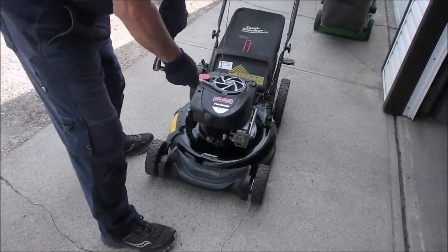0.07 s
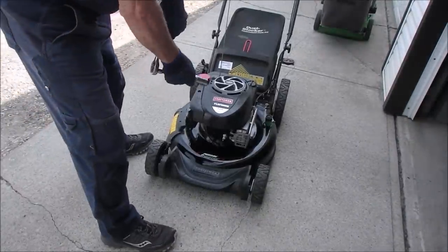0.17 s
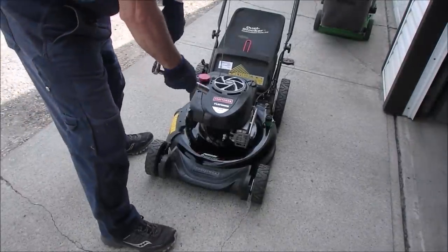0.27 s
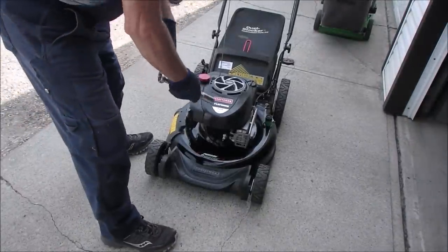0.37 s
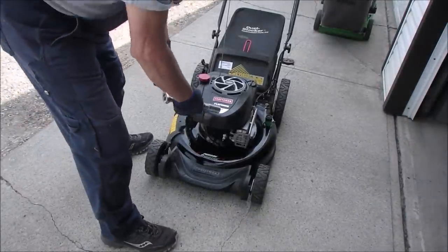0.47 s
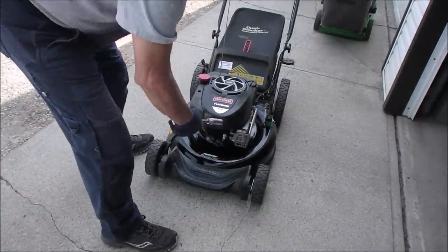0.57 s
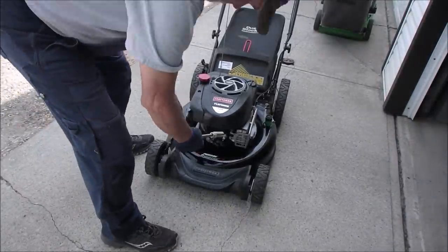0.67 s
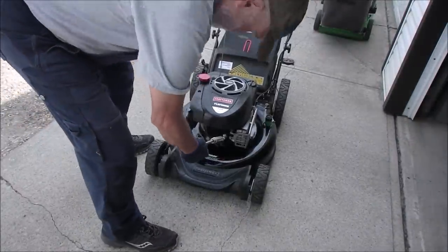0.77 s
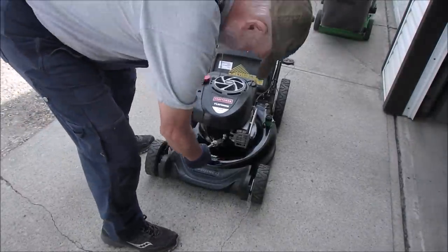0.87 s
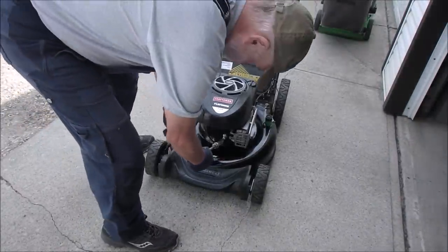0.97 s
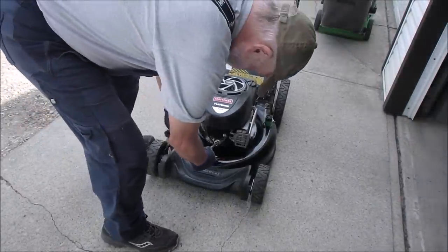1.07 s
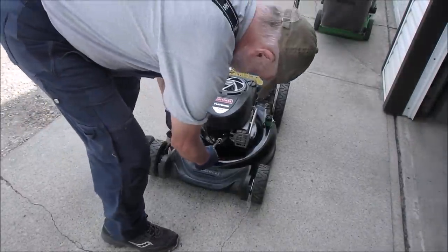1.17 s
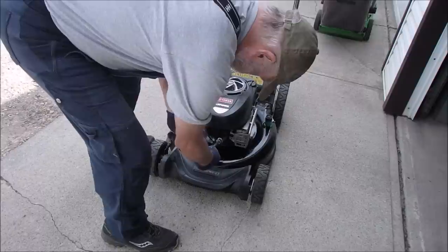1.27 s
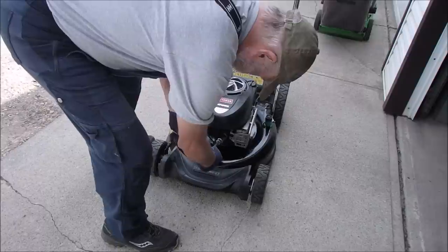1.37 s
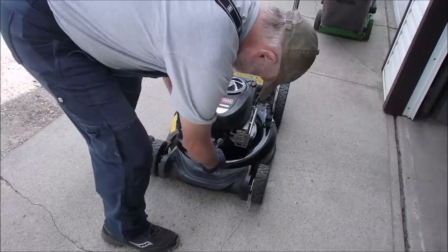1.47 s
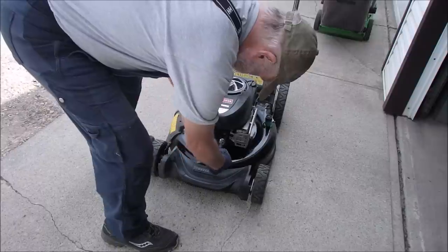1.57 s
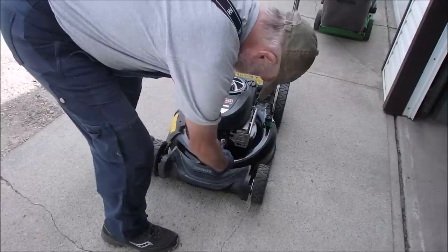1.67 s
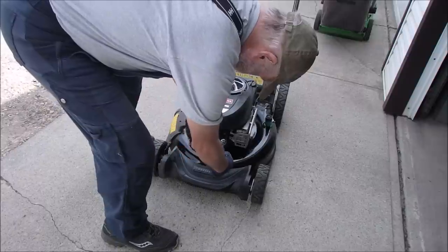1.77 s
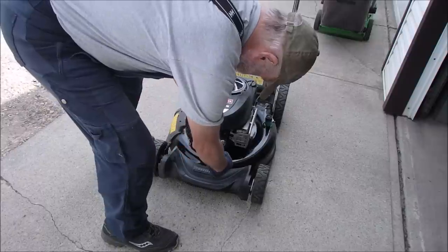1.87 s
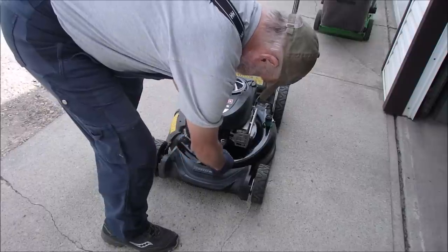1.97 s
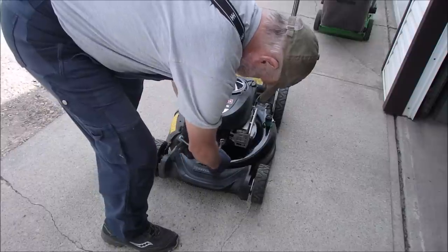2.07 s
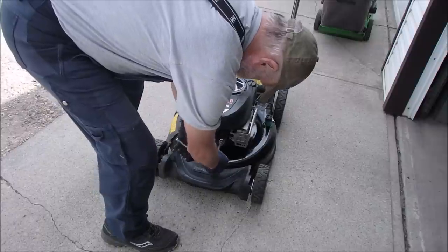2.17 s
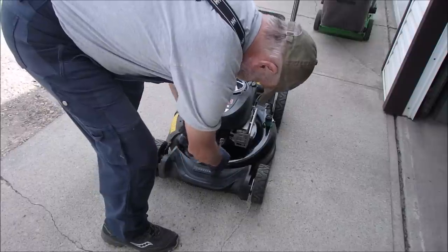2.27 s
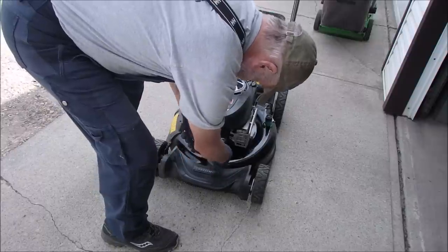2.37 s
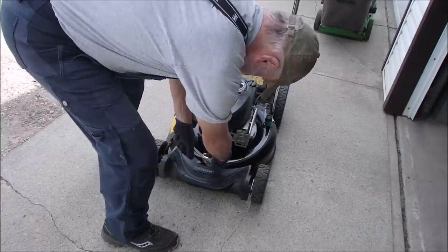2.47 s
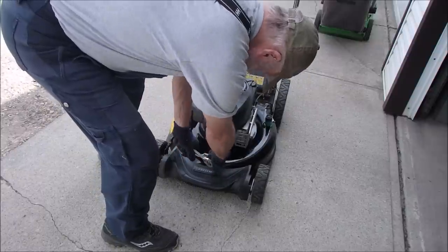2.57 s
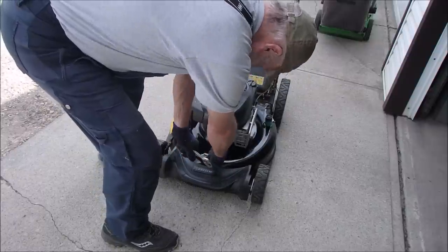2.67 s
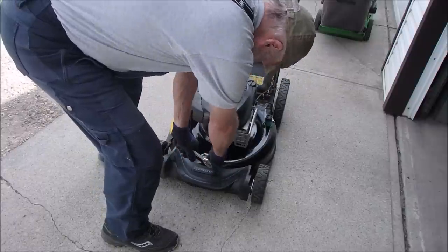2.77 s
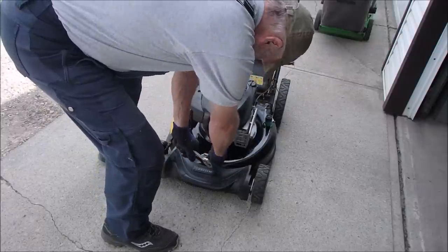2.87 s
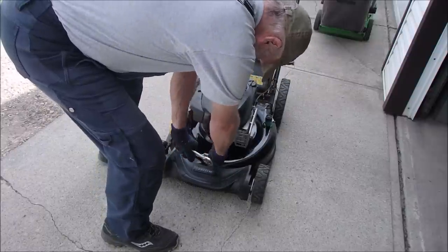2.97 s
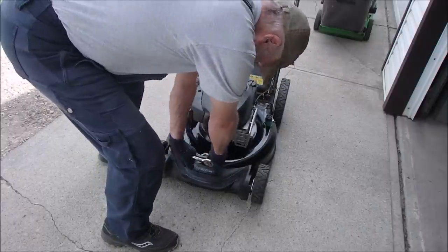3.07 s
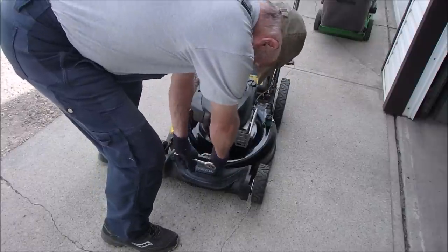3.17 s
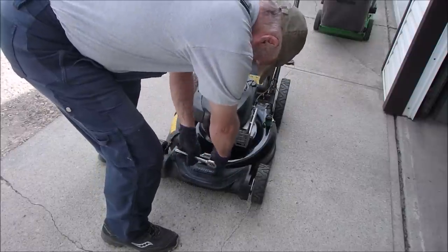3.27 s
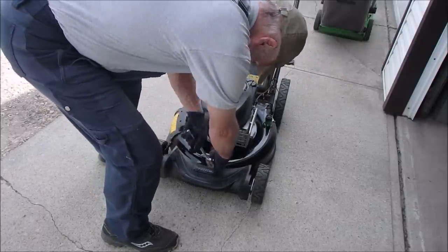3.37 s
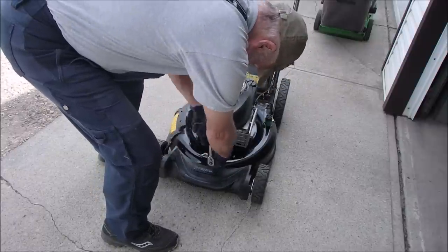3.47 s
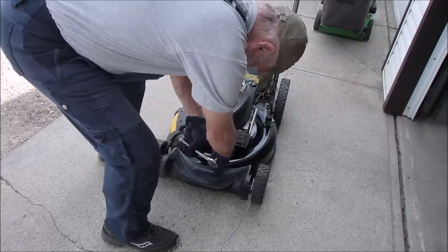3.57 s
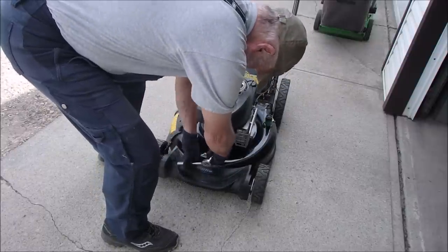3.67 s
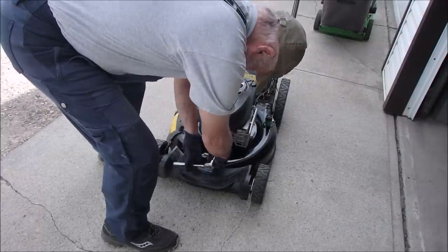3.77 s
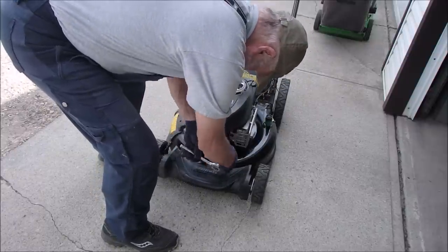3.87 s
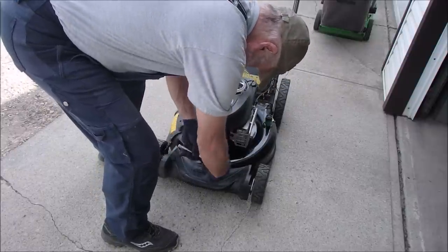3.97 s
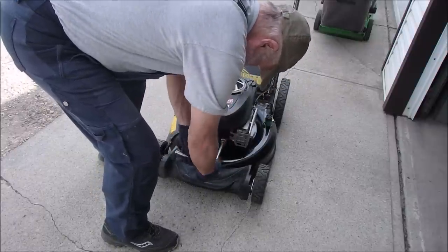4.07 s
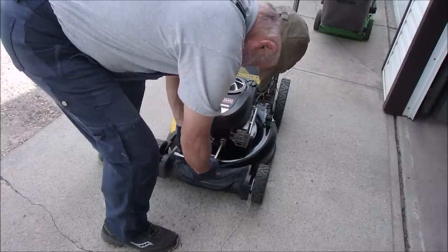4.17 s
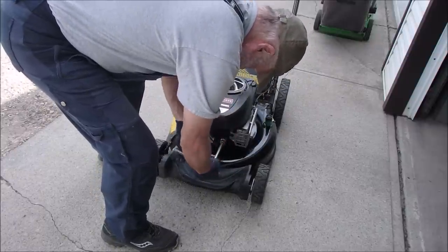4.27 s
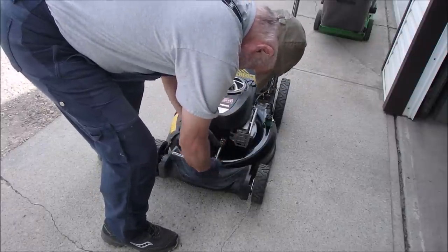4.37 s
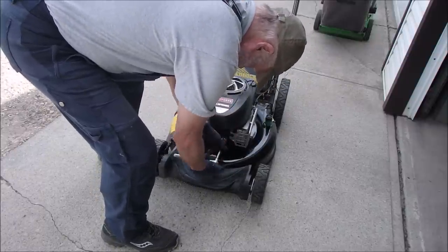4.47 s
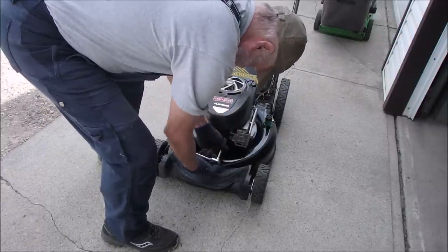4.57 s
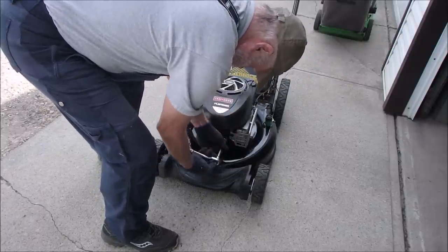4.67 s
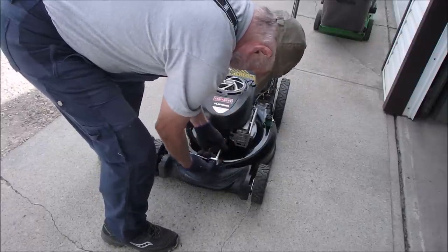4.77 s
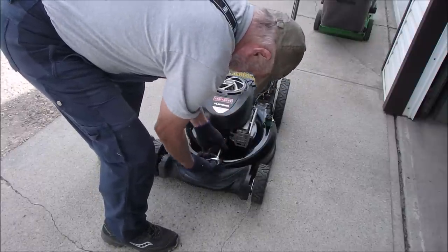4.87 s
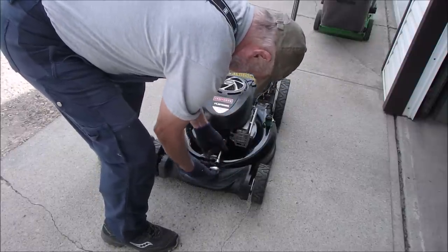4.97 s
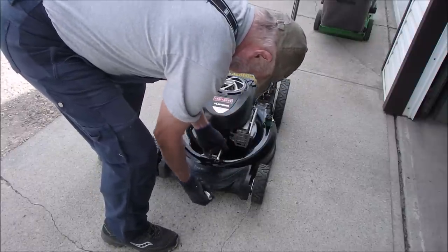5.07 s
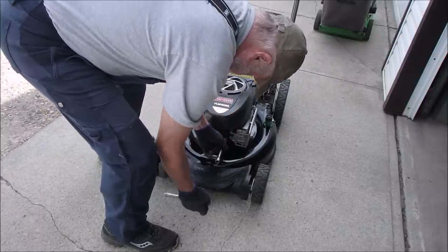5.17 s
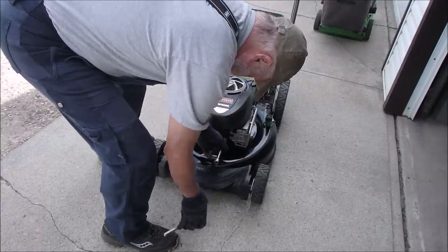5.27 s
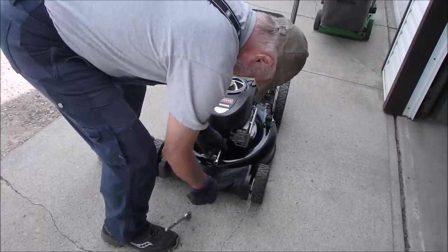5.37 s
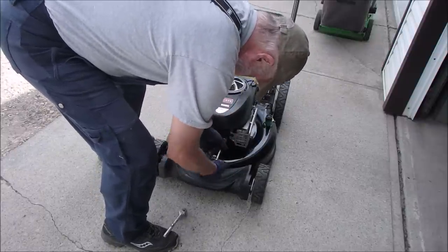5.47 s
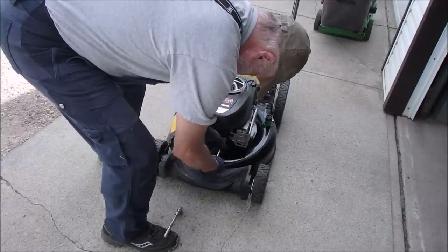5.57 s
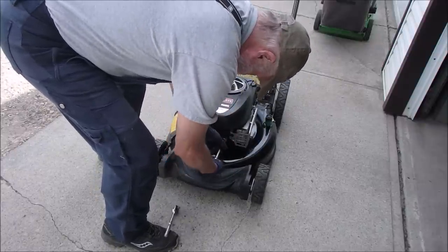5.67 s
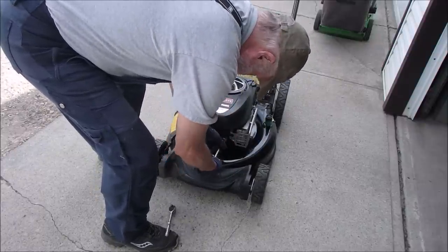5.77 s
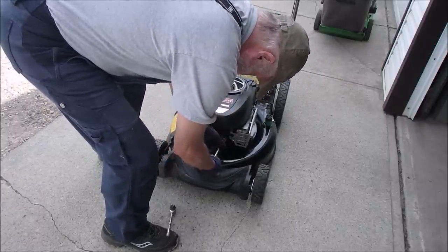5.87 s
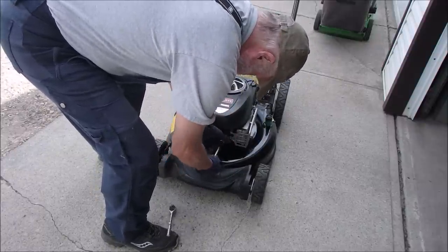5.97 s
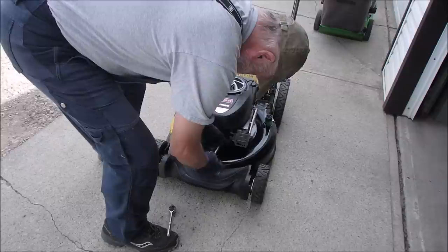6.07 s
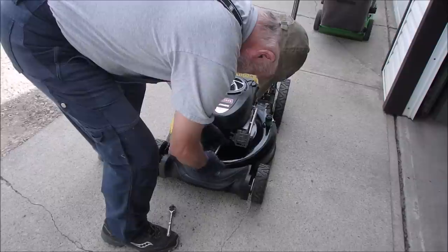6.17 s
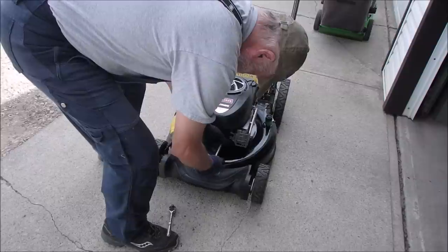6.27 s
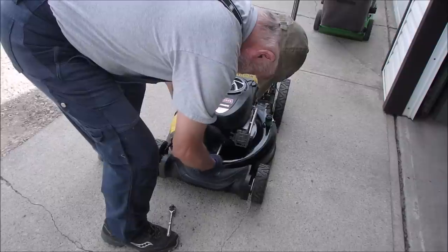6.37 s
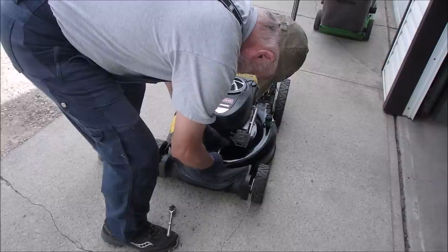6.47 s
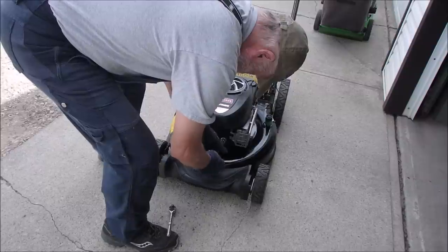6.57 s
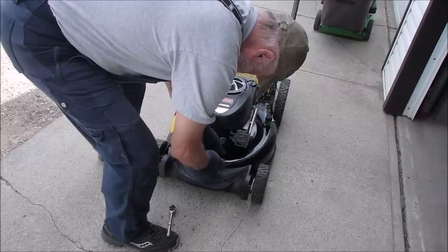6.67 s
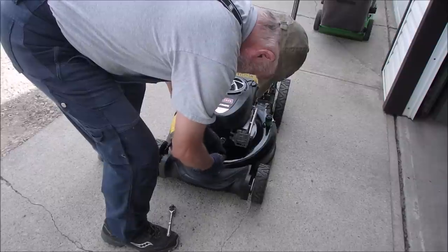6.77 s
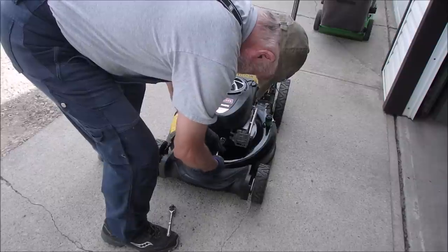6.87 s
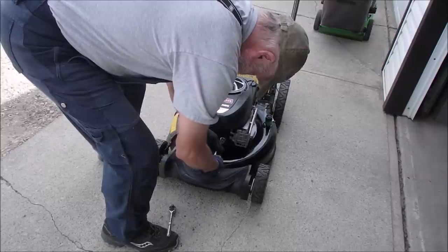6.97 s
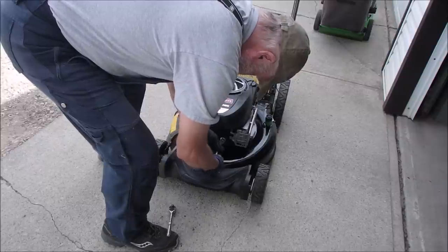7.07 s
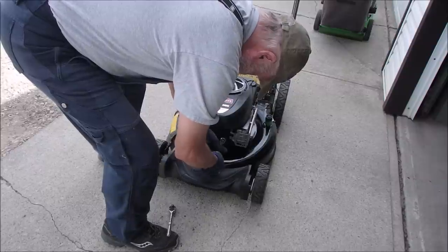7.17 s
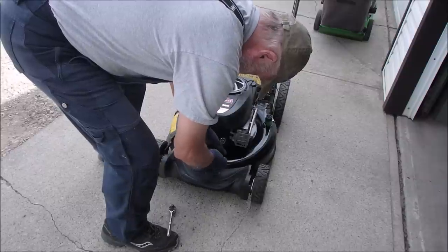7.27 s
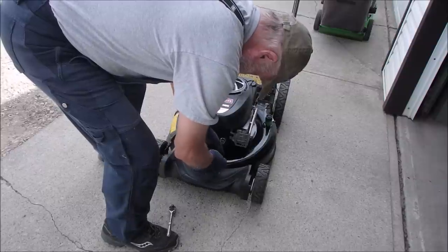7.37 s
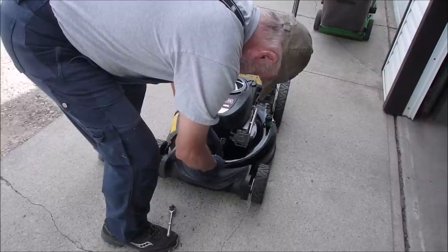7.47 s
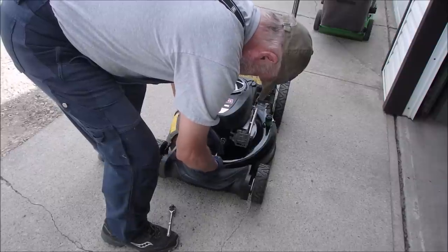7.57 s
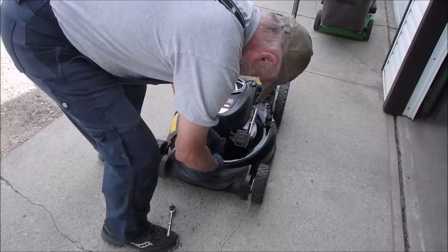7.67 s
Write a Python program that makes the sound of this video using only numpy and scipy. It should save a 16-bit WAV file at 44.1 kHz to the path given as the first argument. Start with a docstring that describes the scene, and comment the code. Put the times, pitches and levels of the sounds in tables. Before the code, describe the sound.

Close to a stereo microphone outside a garage, a ratchet ticks briefly, then steel knocks irregularly on a mower engine with a thin ringing socket. More clanks and a second ratchet burst follow. A wrench drops on concrete with a sharp ringing crack and small bounces, leaving sparse, softer knocks. A distant bird chirps hoarsely; light wind bumps mostly on the left.

```python
"""Spark plug and socket ratchet on a driveway

Close to the microphone, a spark plug is worked out of a lawn mower: steel blows are noise bursts plus engine modes.
The ratchet pawl ticks and scrapes, the wrench cracks and rings on the concrete, and gloves brush in noise swells.
Farther off a bird chirps in falling, raspy slurs; the garage front echoes and distant hum and hiss lie beneath.
Gusts bump mainly the left microphone port, and loud treble such as the drop makes the gain control duck.
"""
import sys
import numpy as np
from scipy import signal
from scipy.fft import rfft, irfft, next_fast_len
from scipy.io import wavfile
from scipy.ndimage import uniform_filter1d, minimum_filter1d, map_coordinates

SR = 44100
rng = np.random.default_rng(int(sys.argv[2]) if len(sys.argv) > 2 else 0)


def wrap_up_sound(samples):
    """Save the sound to the file named by the first command line argument, as 16-bit audio."""
    columns = np.atleast_2d(samples).T
    # keep every value between -1 and 1, then stretch to whole-number steps
    tamed = np.clip(columns, -1, 1)
    steps = np.round(tamed * 32767).astype(np.int16)
    wavfile.write(sys.argv[1], SR, steps)


N = 340879
RING = np.arange(int(.6 * SR)) / SR  # time axis of one ringing sound, s


def amp(db):
    """Decibels to gain."""
    return 10 ** (np.asarray(db) / 20)


def unit(x):
    """x at rms 1."""
    return x / np.sqrt(np.mean(x ** 2) + 1e-20)


def along(points, hz):
    """(Hz, value) points read on a log frequency axis."""
    point_hz, value = np.transpose(points)
    return np.interp(np.log(hz + 1), np.log(point_hz), value)


def tilted(spectrum, tilt):
    """A spectrum with the (Hz, dB) points of a tilt added."""
    hz, db = np.transpose(spectrum)
    return np.c_[hz, db + along(tilt, hz)]


def filtered(x, response):
    """x times a complex response of frequency."""
    n = x.shape[-1]
    padded = next_fast_len(n + 4096)
    hz = np.fft.rfftfreq(padded, 1 / SR)
    return irfft(rfft(x, padded) * response(hz), padded)[..., :n]


def wobble(rate):
    """A smooth random curve, rate knots a second."""
    knots = rng.standard_normal(int(N * rate / SR) + 4)
    return map_coordinates(knots, [np.arange(N) * rate / SR])


def swells(rows):
    """A gain curve of smooth humps from (middle s, length s, dB) rows."""
    t = np.arange(N) / SR
    return sum(amp(db) * np.exp(-2 * ((t - s) / length) ** 2) for s, length, db in rows)


def add(track, s, sound):
    """Mix a sound into the track at time s."""
    start = max(round(s * SR), 0)
    part = sound[..., :N - start]
    track[:, start:start + part.shape[-1]] += part


def noise(size, spectrum, alike, lo_hz=0, hi_hz=SR):
    """Coloured stereo noise of rms 1 between two edges; alike sets how far left and right agree."""
    hz = np.fft.rfftfreq(size, 1 / SR)
    turn = np.arccos(np.clip(along(alike, hz), -1, 1)) / 2
    gain = amp(along(spectrum, hz)) * (hz >= lo_hz) * (hz < hi_hz)
    white = rfft(rng.standard_normal((2, size)))
    mid, side = irfft(white * gain * [np.cos(turn), np.sin(turn)], size)
    return unit(np.array([mid + side, mid - side]))


# Left-right likeness of sounds close to the microphone: pitch_hz, likeness (1 = the same)
NEAR_ALIKE = [(300, 0.85), (2500, 1), (5500, 0.22), (9000, 0.64)]


def burst(spectrum, t60, lo_hz=0, hi_hz=SR, size=8192):
    """Crowded, quickly dying modes set off by one contact."""
    t = RING[:size]
    attack = 1 - np.exp(-t / .0003)
    fade = 1000 ** (-t / t60) * attack
    sound = noise(size, spectrum, NEAR_ALIKE, lo_hz, hi_hz) * fade
    return unit(sound) * np.sqrt(np.mean(fade ** 2))


def ring(modes, scatter_db, detune, tilt=((1000, 0), (2000, 0))):
    """Single modes, struck at new strengths and tilted by (Hz, dB) points; the grip detunes them a little."""
    hz, db, t60 = np.transpose(modes)[:, :, None]
    level, shift, phase = rng.standard_normal((3, len(modes), 1))
    swing = np.sin(2 * np.pi * (hz * (1 + detune * shift) * RING + phase))
    strength = amp(db + scatter_db * level + along(tilt, hz))
    sound = np.sum(strength * np.exp(-np.log(1000) * RING / t60) * swing, axis=0)
    return sound * (1 - np.exp(-RING / .0003))


def shiver():
    """The gain of a part that chatters in its seat while it rings."""
    return unit(amp(3.7 * wobble(200)[:len(RING)]))


# Steel knocking on the engine, close by, plus the loudest ratchet tooth at 3.935 s: start_s, clank_db, then
# relative to the clank thud_db, clink_db (extra near 2.6 kHz), edge_db (treble)
KNOCKS = [(1.123, -22.5, -4.5, 4.5, -.5), (1.252, -25.5, -10, 7.5, -0.5), (1.315, -25, -8, 3, -3),
          (1.324, -20, -2.5, 1, 1), (1.372, -34, -8, -9, -14), (1.438, -26.5, -10.5, 1.5, 0),
          (1.68, -46, 3.5, -2, -5), (1.92, -26.5, -1, 2, -5.5), (1.943, -29, 1.5, -3, -5),
          (1.959, -21, -8.5, 4, -4), (2.042, -38, 6.5, -4, -6), (2.077, -33.5, 7.5, 0, -5.5),
          (2.349, -18, -3.5, 5.5, -10), (2.514, -42.5, 9, -5, -15), (3.056, -25, 2, -4, -9.5),
          (3.072, -28.5, 2.5, -3, -9), (3.086, -23.5, -2.5, -3, -11), (3.305, -26, -3.5, -9, -17),
          (3.649, -39.5, 5, -2, -4), (3.935, -41.5, -4, -2, 7), (4.045, -25.5, -2.5, 5, -14),
          (4.388, -22.5, -8, 3, -12.5), (4.553, -39.5, 3, -1, 4), (4.597, -34, 4.5, -4, 4),
          (5.069, -35.5, -10, 13, 13), (5.108, -28, 1.5, 1, -4), (5.169, -24.5, -2, -1, -4.5),
          (5.614, -36, 0.5, 1, -4), (6.274, -30, 0.5, -4, -17), (6.66, -39, 0, 0, .5),
          (7.186, -49, 3, -2, 4)]
REBOUND_S, REBOUND_SCATTER = .004, .4  # typical flight, spread of its logarithm
REBOUND_LOSS_DB = 4


def knocks():
    """Slack taken up between socket, plug and engine: every blow rebounds once, a little softer."""
    out = np.zeros((2, N))
    for s, db, *colour in KNOCKS:
        flight_s = REBOUND_S * np.exp(REBOUND_SCATTER * rng.standard_normal())
        add(out, s, amp(db) * contact(*colour))
        add(out, s + flight_s, amp(db - REBOUND_LOSS_DB) * contact(*colour))
    return out


# Colour of a knock before its own tilt: pitch_hz, level_db (relative)
CLANK = [(120, -20.5), (280, -16.5), (520, -2.5), (950, -1), (1350, 4.5), (1900, -5), (2400, 1), (2800, -5),
         (3400, -10), (5300, -9.5), (6400, -18.5), (10600, -18.5), (12500, -39)]
# Ringing of engine, muffler and deck: pitch_hz, level_db (relative), t60_s
ENGINE = [(424, -25, .4), (548, -16, .16), (681, -18, .13), (971, -5, .1), (1201, -15, .22),
          (1301, -14, .13), (1405, -17, .09), (1690, -22, .2), (2286, -14, .08), (2424, -13, .09),
          (2790, -15, .07), (2940, -17, .09)]


def contact(thud_db, clink_db, edge_db, thud_t60=0.11, clank_t60=0.1, edge_t60=0.083, crack_t60=0.012,
            split_lo_hz=1000, split_hi_hz=3500):
    """Steel meets the engine once: a dry crack and a rough clank, with a thud in the deck and ringing modes."""
    out = np.zeros((2, len(RING)))
    # the spot that is struck sets the clink; the harder the contact, the higher its crack reaches
    upper_db = 0.64 * (edge_db + 13.5) - 0.66 * (thud_db + 1.5)
    colour = [(1800, 0), (2400, clink_db), (2850, clink_db), (3400, upper_db)]
    clank = tilted(CLANK, colour)
    edge = tilted(CLANK, [(5000, 0), (10000, 0.8 * (edge_db + 3.5))])
    add(out, .001, amp(thud_db) * burst(CLANK, thud_t60, hi_hz=split_lo_hz))
    add(out, 0, amp(1.02) * burst(clank, clank_t60, split_lo_hz, split_hi_hz))
    add(out, 0, amp(0.48 * clink_db - 0.5) * burst(clank, crack_t60, split_lo_hz, split_hi_hz))
    add(out, 0, amp(edge_db - 3.5) * burst(edge, edge_t60, lo_hz=split_hi_hz))
    add(out, 0, amp(edge_db + 2.5) * burst(edge, crack_t60, lo_hz=split_hi_hz))
    return out + amp(-1.5) * shiver() * ring(ENGINE, scatter_db=3.5, detune=0.007, tilt=colour)


# Fingers twirl the loose plug, which taps faintly at an uneven pace
TWIRL_START_S, TAP_GAP_S, TAP_SCATTER_S = 7.425, .108, 0.00492
TAP_DB, TAP_THUD_DB, TAP_CLINK_DB, TAP_EDGE_DB = -45, 2, -4.5, -22  # the last three relative to the clank


def plug_taps(count=3):
    """The loose plug wobbles in its thread and taps once with each turn of the fingers."""
    out = np.zeros((2, N))
    times = TWIRL_START_S + TAP_GAP_S * np.arange(count) + TAP_SCATTER_S * rng.standard_normal(count)
    for s in times:
        add(out, s, amp(TAP_DB) * contact(TAP_THUD_DB, TAP_CLINK_DB, TAP_EDGE_DB))
    return out


# Blows that set the loose socket singing: start_s, level_db (before the mode levels),
# pitch_hz near which the contact excites it most
SINGS = [(0.105, -54, 9520), (1.123, -38, 9520), (1.252, -38, 9520), (1.325, -46, 3400), (1.437, -38, 5600)]
# Ringing of the socket: pitch_hz, level_db (relative), t60_s
SOCKET = [(3400, 0, .28), (3445, -1, .14), (4877, -3, .22), (5450, -8, .24), (6600, -5, .2), (9505, -4, .3),
          (9565, -5, .2)]


def socket(favour_db=17):
    """The thin steel tube rings and shivers while it sits loose; the struck spot favours the nearest modes."""
    out = np.zeros((2, N))
    for s, db, hz in SINGS:
        spot = [(.75 * hz, 0), (hz, favour_db), (1.3 * hz, 0)]
        add(out, s, amp(db) * shiver() * ring(SOCKET, scatter_db=0.5, detune=0.0014, tilt=spot))
    return out


# Colour of a pawl tick before its stroke's tilt: pitch_hz, level_db (relative)
PAWL = [(1200, -6.5), (2400, -2.5), (3700, -3), (5000, 2.5), (6300, -10.5), (7900, 4), (9300, -10.5),
        (12300, -7), (14000, -22)]
# Back strokes of the handle: start_s, length_s, teeth (passed), fastest_tooth (index at top speed),
# slowing (per tooth squared), tick_db (nominal), scrape_db, pitch_hz at which the ticks ring most
STROKES = [(0.092, 0.14, 10, 2.25, 0.072, -31.5, -37, 4100),
           (3.41, 0.13, 9, 3.18, .026, -29.5, -33.5, 3650), (3.922, .034, 3, 0.149, 0.93, -29, -48, 4900)]
TICK_DB_PER_DOUBLING, TICK_SCATTER_DB = 0.5, 2  # ticks soften as the gap between teeth doubles
SCRAPE_SHARE = 0.41  # length of the scrape's swell as a part of the stroke


def ratchet():
    """The handle speeds up and slows: each tooth ticks, and at speed the scraping pawl excites its main mode."""
    scrape_colour = [(2300, -15), (3600, -12), (3970, 5.5), (4300, -10), (14000, -42)]
    scrape = noise(N, scrape_colour, NEAR_ALIKE, lo_hz=1980)
    out = np.zeros((2, N))
    for start, length, teeth, fastest, slowing, tick_db, scrape_db, hz in STROKES:
        tick = tilted(PAWL, [(0.86 * hz, 0), (hz, 5.5), (1.5 * hz, 0)])
        tooth = np.arange(round(teeth))
        slowness = 1 + abs(slowing) * (tooth - fastest) ** 2
        elapsed = np.cumsum(slowness) - slowness
        times = start + length * elapsed / elapsed[-1]
        scatter = TICK_SCATTER_DB * rng.standard_normal(len(tooth))
        levels = tick_db - TICK_DB_PER_DOUBLING * np.log2(slowness) + scatter
        for s, db in zip(times, levels):
            ringing = amp(db - 2) * burst(tick, t60=0.065)
            click = amp(db + 3.5) * burst(tick, t60=0.0056)
            add(out, s, ringing + click)
        top_speed_s = np.interp(fastest + .5, tooth, times)
        out += swells([(top_speed_s, SCRAPE_SHARE * length, scrape_db)]) * scrape
    return out


# The wrench landing, bouncing and rocking on the concrete: start_s, crack_db, ring_db (before the mode levels)
BOUNCES = [(5.393, -5.5, -13), (5.517, -18.5, -26), (5.56, -27, -38), (5.673, -27, -31), (5.871, -31, -32),
           (5.882, -28.5, -28), (5.965, -34.5, -50), (6.049, -42, -36)]
# Colour of the crack on concrete: pitch_hz, level_db (relative)
CONCRETE = [(100, -27), (330, 0.5), (650, -11), (1350, -1.5), (1850, -6.5), (2550, -0.5), (4500, 1.5),
            (6200, -12), (7800, 2.5), (15000, -25.5)]
# Ringing of the wrench: pitch_hz, level_db (relative), t60_s
WRENCH = [(1357, -16, .22), (3973, -2.5, .3), (4020, -2, .12), (7755, 0, .06), (7775, -5, .3),
          (7850, -7, .22), (10804, -15, .24), (12349, -17, .22)]


def dropped_wrench(ground_db_per_s=170):
    """Steel cracks on concrete, buzzes, rings and shivers; after the landing the ground damps each ping."""
    out = np.zeros((2, N))
    landing_s = BOUNCES[0][0]
    add(out, landing_s, amp(-2) * burst([(8000, 0)], t60=0.005, lo_hz=8000))
    for k, (s, crack_db, ring_db) in enumerate(BOUNCES):
        damping = amp(-ground_db_per_s * RING * (k > 0))
        add(out, s, amp(crack_db) * burst(CONCRETE, t60=0.013))
        add(out, s, amp(crack_db - 3.5) * burst(CONCRETE, t60=0.068))
        add(out, s, amp(ring_db) * shiver() * damping * ring(WRENCH, scatter_db=1.0, detune=0.00071))
    return out


# Gloves and sleeves brushing the mower: middle_s, length_s, level_db
BRUSHES = [(0.715, 0.31, -45.5), (3.62, 0.039, -44), (5.116, 0.074, -39.5), (6.688, 0.037, -40),
           (7.256, 0.077, -56)]


def gloves():
    """Cloth catches and slides in grainy swells."""
    cloth_colour = [(200, -25.0), (800, 2.5), (3000, 0.0), (5000, -2.5), (14000, -16.5)]
    cloth = noise(N, cloth_colour, NEAR_ALIKE)
    grain = amp(1.5 * wobble(170))
    return swells(BRUSHES) * unit(cloth * grain)


def radiated(x, corner_hz=110):
    """Small metal parts give off little deep bass."""
    return filtered(x, lambda hz: (1j * hz / (corner_hz + 1j * hz)) ** 2)


# Chirps of a bird farther off: start_s, level_db (before the slur's own level)
CHIRPS = [(2.635, -49.5), (4.245, -47), (6.425, -59.5)]
# One chirp, a falling slur: time_s (after its start), pitch_hz, level_db (relative)
SLUR = [(0, 4510, -8), (.014, 4800, 4), (.026, 3600, 4.5), (.072, 2600, 0), (.1, 2400, -18)]


def bird():
    """A small bird repeats one hoarse, falling chirp: a sine with jittered pitch and rasping level."""
    out = np.zeros((2, N))
    s, hz, level = np.transpose(SLUR)
    t = RING[RING < s[-1]]
    for start, db in CHIRPS:
        pitch = np.interp(t, s, hz) * (1 + .09 * wobble(900)[:len(t)])
        rasp = unit(wobble(600)[:len(t)])
        tone = np.sin(2 * np.pi * np.cumsum(pitch) / SR)
        add(out, start, amp(db + np.interp(t, s, level)) * rasp * tone)
    return out


# Time and treble decay of the garage's reverberant tail: pitch_hz, t60_s
GARAGE = [(200, 0.68), (2500, 0.65), (6000, 0.66), (12000, 0.066)]


def garage(x, echo_s=.047, echo_db=-19, tail_db=-15):
    """The garage front throws back one smeared echo, and a tail that loses its treble first."""
    hz, t, z = signal.stft(noise(len(RING), [(1000, 0)], FAR_ALIKE), SR, nperseg=256)
    decay = 1000 ** (-t / along(GARAGE, hz)[:, None])
    tail = signal.istft(z * decay, SR, nperseg=256)[1][:, :len(RING)]
    smear = (RING > echo_s) * np.exp(-np.abs(RING - echo_s) / 0.012)
    wall = noise(len(RING), [(1000, 0)], NEAR_ALIKE) * smear
    answer = (amp(tail_db) * unit(tail) + amp(echo_db) * unit(wall)) / np.sqrt(len(RING))
    answer = filtered(answer, lambda f: amp(along([(300, -4.5), (1300, 2.5)], f)))
    return signal.fftconvolve(x, answer, axes=1)[:, :N]


# Strength of two gusts at the microphone, one curve each: time_s, level_db (before the port offsets)
GUSTS = [
    [(2.12, -62), (2.338, -41), (2.354, -66), (2.426, -45.5), (2.444, -64), (2.58, -52), (2.618, -75)],
    [(4.28, -66), (4.368, -43), (4.47, -52), (4.506, -37.5), (4.554, -56), (4.604, -37), (4.636, -69)],
]
# Colour of the buffeting: pitch_hz, level_db (relative)
BUFFET = [(20, -33), (70, -6.5), (140, -0.5), (260, -7.5), (500, -18), (1200, -39)]


def wind():
    """Gusts buffet the ports, the left one most, almost unrelated on the two sides."""
    t = np.arange(N) / SR
    curves = [np.interp(t, *np.transpose(gust), left=-np.inf, right=-np.inf) for gust in GUSTS]
    gusts = sum(amp(curve) for curve in curves)
    return gusts * noise(N, BUFFET, [(100, 0.083)]) * amp([[4], [-6]])  # left, right dB


# Colour of the distant neighbourhood: pitch_hz, level_db (relative)
OUTDOORS = [(20, -22), (50, -12.5), (95, -4.5), (200, -1.5), (500, 0.5), (1300, -3), (1900, -11),
            (2600, -9), (3700, -15.5), (5000, -11.5), (6500, -17), (15000, -17)]
# Left-right likeness of distant sound and of the garage tail: pitch_hz, likeness (1 = the same)
FAR_ALIKE = [(60, 0.14), (180, 0.51), (550, 0.49), (1650, 0.87), (4970, 0.098), (15000, 0.064)]
# Faint steady tones: pitch_hz, level_db (rms)
WHINES = [(1319, -61.5), (14836, -67)]


def background():
    """Distant neighbourhood hum and hiss as drifting noise, with two faint, wavering whines."""
    t = np.arange(N) / SR
    drift = amp(.4 * wobble(2.5))
    air = noise(N, OUTDOORS, FAR_ALIKE) * amp(-46.5) * drift
    tones = sum(amp(db) * np.sqrt(2) * np.sin(2 * np.pi * hz * t + 0.71 * wobble(13)) for hz, db in WHINES)
    return air + tones


def scene():
    """Tools close by, a bird farther off, all before the garage."""
    metal = radiated(knocks() + plug_taps() + socket() + ratchet())
    tools = metal + dropped_wrench() + gloves()
    chirps = bird()
    echoes = garage(tools + amp(7.0) * chirps)  # the bird excites the garage more
    return tools + chirps + echoes + wind() + background()


# The two microphone ports: pitch_hz, balance_db (left minus right), lead_rad (by which left leads)
PORTS = [(100, 8, -.7), (500, 6.5, -1.15), (800, 4.5, -1), (1150, 0, -.45), (1800, .7, -.4),
         (2700, 4.7, -.3), (4500, 4.3, -.9), (6400, 0, -1.5), (9600, -4, -3.7), (14000, -.5, -4.8)]
# Cavities of the microphone housing: pitch_hz, width_hz, depth_db
NOTCHES = [(2190, 90, -17), (3110, 80, -16), (4100, 80, -12), (5110, 80, -11), (6110, 120, -16)]


def microphone(hz):
    """Two unlike ports in a housing whose cavities cut narrow notches."""
    port_hz, balance_db, lead = np.transpose(PORTS)
    balance = amp(along(np.c_[port_hz, balance_db], hz) / 2)
    half = balance * np.exp(.5j * along(np.c_[port_hz, lead], hz))
    dips = [1 - (1 - amp(db)) * 1j * hz * 2 * w / (c * c - hz * hz + 2j * hz * w) for c, w, db in NOTCHES]
    return np.array([half, 1 / half]) * np.prod(dips, axis=0)


def gain_control(x, threshold_db=-19.0, hold_s=0.22, recovery_db_per_s=10.0):
    """A loud treble crack pulls the gain down at once; it holds, then creeps back."""
    treble = filtered(x, lambda hz: hz > 3500)
    power = np.abs(uniform_filter1d(np.mean(treble ** 2, axis=0), size=256, origin=70))
    wanted_db = np.minimum(threshold_db - 10 * np.log10(power + 1e-12), 0)
    reach = int(hold_s * SR / 2)
    held_db = minimum_filter1d(wanted_db, 2 * reach + 1, origin=reach)  # looks back over the hold time
    climb_db = recovery_db_per_s * np.arange(N) / SR
    return x * amp(np.minimum.accumulate(held_db - climb_db) + climb_db)


TOP_HZ = 15500


def record(dry):
    """Microphone colour, gain control and the band limit."""
    heard = filtered(dry, microphone)
    return filtered(gain_control(heard), lambda hz: hz < TOP_HZ)


dry = scene()
out = record(dry)
wrap_up_sound(out)
```